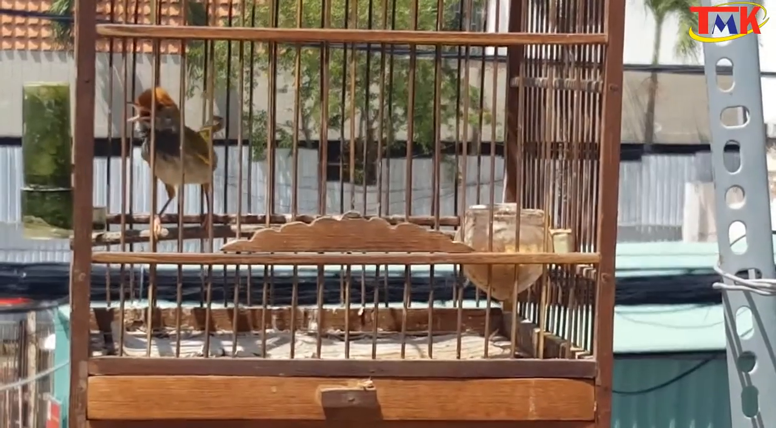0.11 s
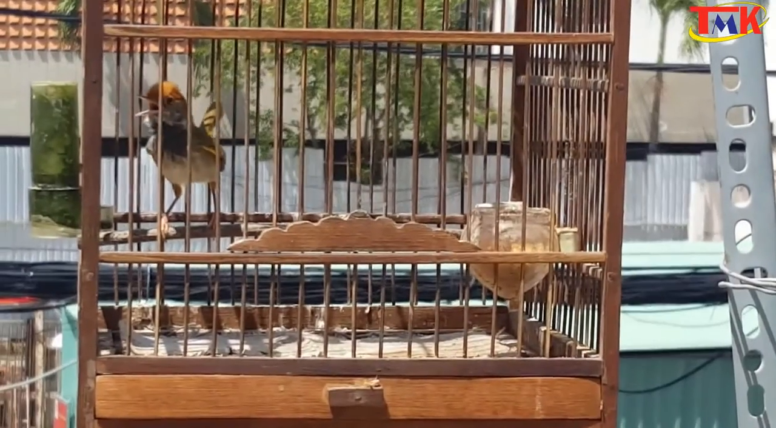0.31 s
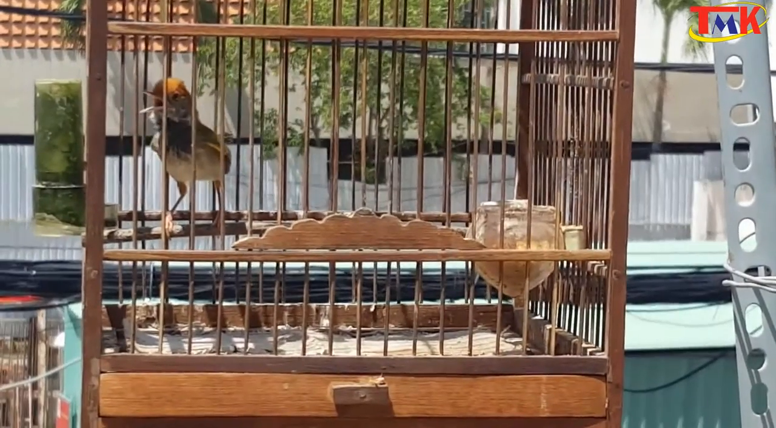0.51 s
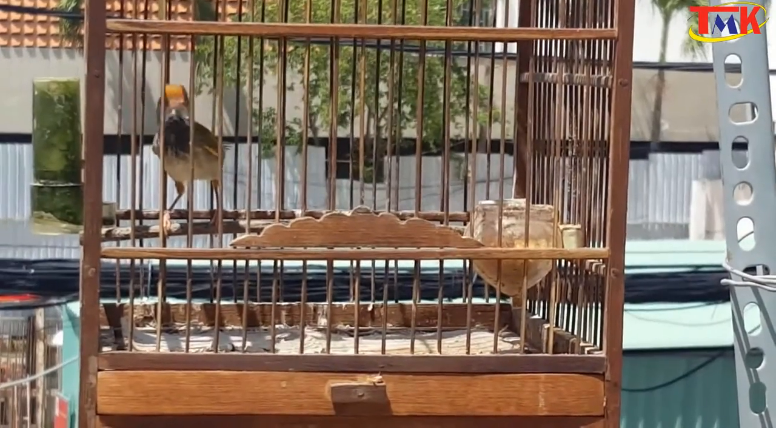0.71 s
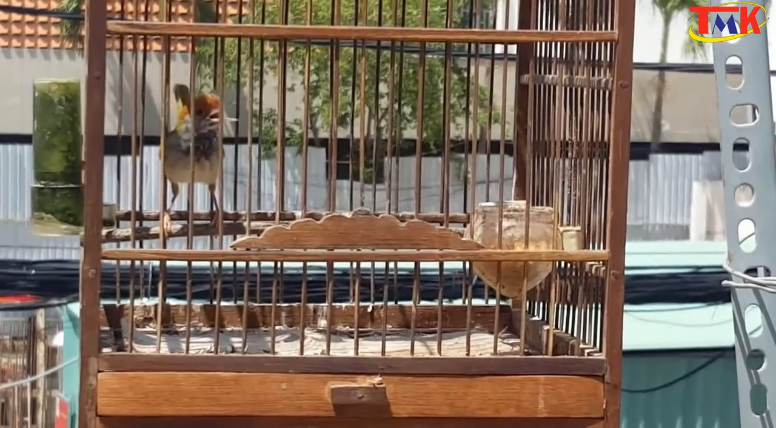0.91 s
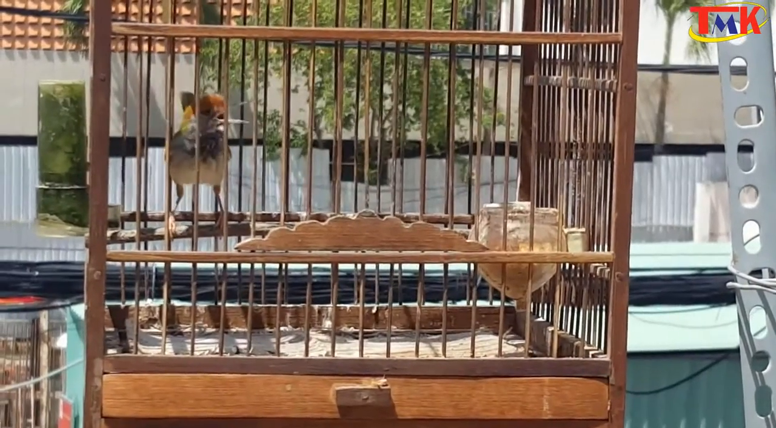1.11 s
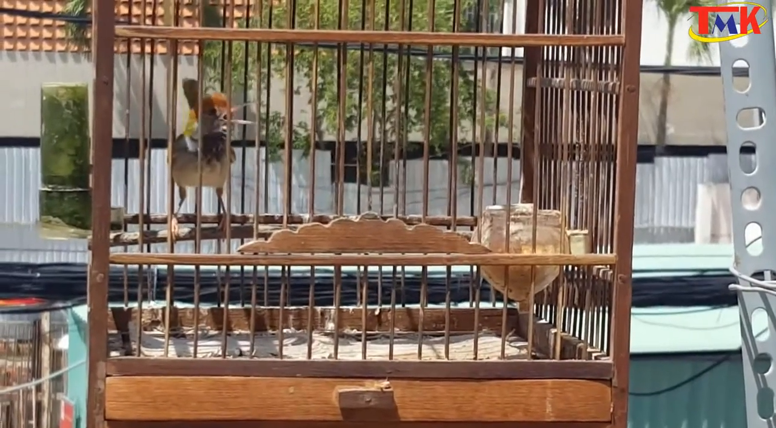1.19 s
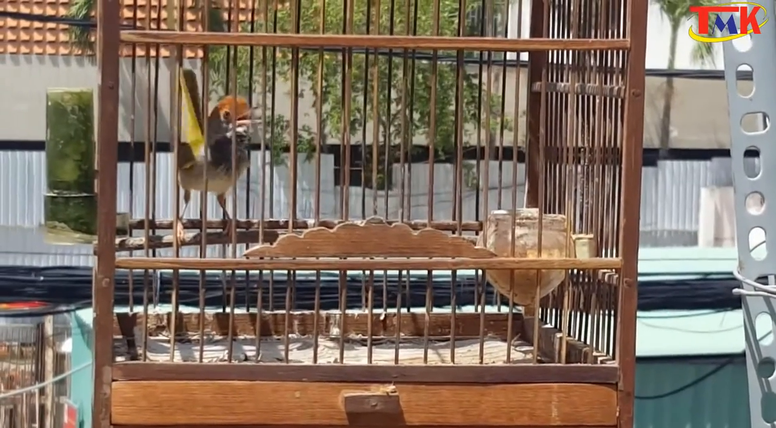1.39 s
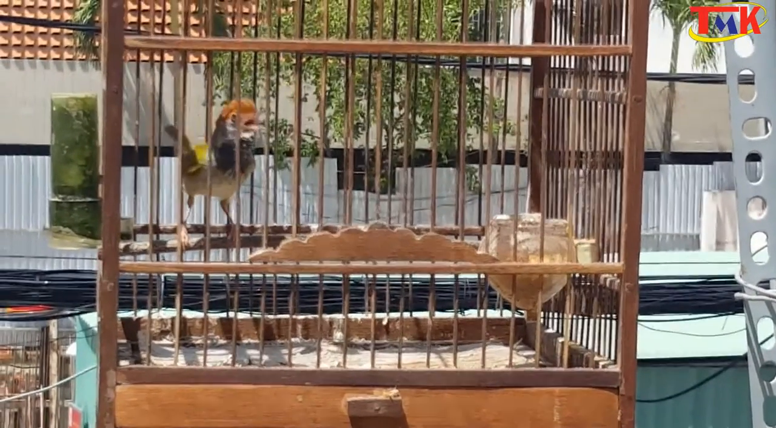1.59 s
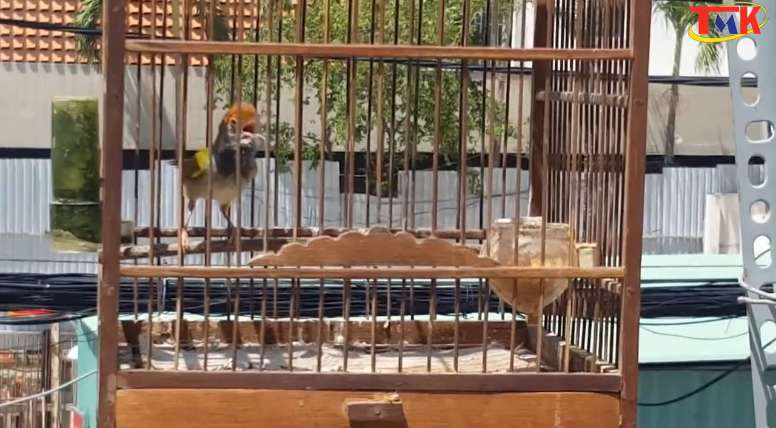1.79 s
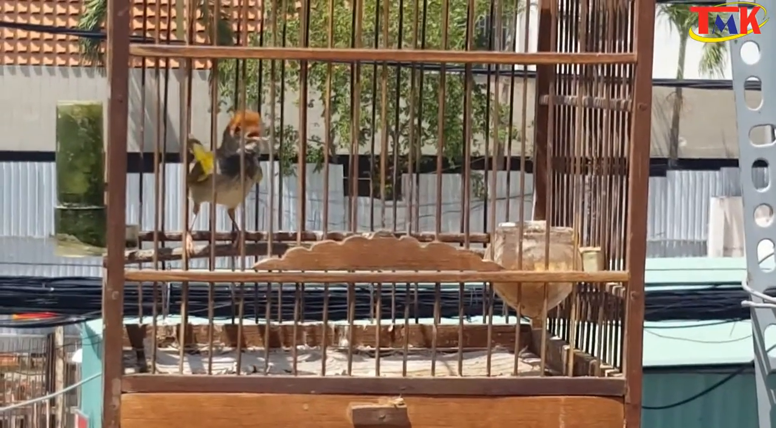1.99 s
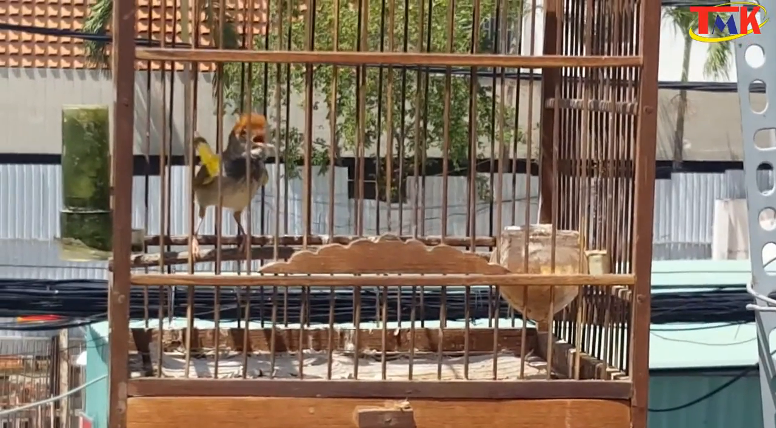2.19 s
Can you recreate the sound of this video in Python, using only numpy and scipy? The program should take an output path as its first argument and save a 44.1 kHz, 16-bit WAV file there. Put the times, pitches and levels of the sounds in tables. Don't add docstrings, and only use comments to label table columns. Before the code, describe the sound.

Two quick bursts of piercing bird trill, each opened by a snappy chip and closed by a louder, slightly longer note, close and to the left; farther birds chirp with wall echo above a low distant traffic drone.

```python
import sys
import numpy as np
from scipy import signal
from scipy.io import wavfile
from scipy.ndimage import uniform_filter1d

SR = 44100
rng = np.random.default_rng(int(sys.argv[2]) if len(sys.argv) > 2 else 0)


def master_out(mix):
    frames = np.transpose(np.atleast_2d(mix))
    ceiling = np.clip(frames, -1, 1)
    pcm = np.round(ceiling * 32767).astype(np.int16)
    wavfile.write(sys.argv[1], SR, pcm)


def natural_amplitude(level_db):
    exponent = np.asarray(level_db, float) / 20
    return 10 ** exponent


N = 97020

SINGER_OVERTONES_DB = [-48, -60, -50]


def evened(x):
    return x / np.sqrt(np.mean(abs(x) ** 2) + 1e-20)


def read(points, hz):
    point_hz, value = np.transpose(points)
    return np.interp(np.log(hz + 1), np.log(point_hz + 1), value)


def add(mix, start_s, sound):
    part = mix[max(round(start_s * SR), 0):][:len(sound)]
    part += sound[:len(part)]


def syrinx(hz, level, overtones_db, waver_hz):
    smooth = uniform_filter1d(rng.standard_normal(6000), 90)
    wobble = evened(uniform_filter1d(smooth, 90))
    phase = 2 * np.pi * np.cumsum(hz + waver_hz * np.resize(wobble, len(hz))) / SR
    wave = np.sin(phase)
    for harmonic, db in enumerate(overtones_db, 2):
        wave = wave + natural_amplitude(db) * np.sin(harmonic * phase) * (harmonic * hz < 16000)
    return level * wave


def glide(length_s, level_db, from_hz, to_hz, edge_s, overtones_db, waver_hz,
          bend=1, release=1, arch_hz=0, hook_hz=0):
    t = np.arange(0, length_s, 1 / SR)
    nearest_end = np.minimum(t, (length_s - t) / release)
    level = natural_amplitude(level_db) * np.sin(np.pi / 2 * np.clip(nearest_end / edge_s, 0, 1)) ** 2
    hz = from_hz + (to_hz - from_hz) * (t / length_s) ** bend
    hz = hz + arch_hz * np.sin(np.pi * t / length_s) ** 2
    hz = hz + hook_hz * np.exp(-t / 0.00064)
    return syrinx(hz, level, overtones_db, waver_hz)


def calls(rows, edge_s, overtones_db, waver_hz, bend=1):
    out = np.zeros(N)
    for start_s, *note in rows:
        add(out, start_s, glide(*note, edge_s, overtones_db, waver_hz, bend=bend))
    return out


def phrase(curves, overtones_db, waver_hz):
    out = np.zeros(N)
    for curve in curves:
        time_s, pitch_hz, level_db = np.transpose(curve)
        t = np.arange(time_s[0], time_s[-1], 1 / SR)
        hz = uniform_filter1d(np.interp(t, time_s, pitch_hz), 150)
        level = np.sqrt(2) * natural_amplitude(np.interp(t, time_s, level_db)) * signal.windows.tukey(len(t), .08)
        add(out, time_s[0], syrinx(hz, level, overtones_db, waver_hz))
    return out


def placed(x, pan_db, lag, wet_db, t60, early_db):
    size = SR // 2
    taps = np.zeros((2, size))
    at = np.arange(200, size - 20, 20) + rng.integers(0, 20, (2, (size - 201) // 20))
    np.put_along_axis(taps, at, rng.choice([-1., 1.], at.shape), 1)
    taps *= natural_amplitude(-60 * np.arange(size) / SR / t60)
    taps *= natural_amplitude(wet_db) / np.linalg.norm(taps[0])
    echoes = rng.integers(120, 1100, (2, 6))
    bounces = natural_amplitude(early_db - echoes / 110) * rng.choice([-1., 1.], echoes.shape)
    np.put_along_axis(taps, echoes, bounces, 1)
    taps[0, max(round(lag), 0)] = natural_amplitude(pan_db / 2)
    taps[1, max(-round(lag), 0)] = natural_amplitude(-pan_db / 2)
    return signal.fftconvolve(x[None], taps, axes=1)[:, :N]


def wash(shape_db, level_db, patchy_db, swell_db):
    # frequency_hz, coherence (0 to 1)
    likeness = [(60, .98), (200, .98), (500, .6), (1500, .45), (4000, .3)]
    # frequency_hz, phase_rad
    phase_lag = [(300, .1), (700, 1.1), (1500, 2.7)]
    count, hz = N // 512 + 5, np.fft.rfftfreq(2048, 1 / SR)
    a, b, c, d, patches = rng.standard_normal((count, 1025, 5)).T
    patches = evened(uniform_filter1d(uniform_filter1d(patches, 30, 0), 6, 1))
    swell = evened(uniform_filter1d(rng.standard_normal(count), 9))
    same = np.clip(read(likeness, hz), -1, 1)[:, None]
    left, other = a + 1j * b, c + 1j * d
    right = same * np.exp(-1j * read(phase_lag, hz))[:, None] * left + np.sqrt(1 - same ** 2) * other
    z = np.array([left * natural_amplitude(1.77), right])
    z *= natural_amplitude(shape_db(hz)[:, None] + patchy_db * patches + swell_db * swell)
    return natural_amplitude(level_db) * evened(signal.istft(z, nperseg=2048, noverlap=1536)[1][:, :N])


def city():
    # frequency_hz, density_db (per Hz)
    rumble = [(25, -48), (66, -1.5), (130, -1), (266, -9.5), (430, -15.5), (1500, -23)]

    def shape_db(hz):
        treble_loss = 30 * np.clip(np.log2((hz + 1) / 2000), 0, 3)
        return read(rumble, hz) - treble_loss - 40 * (hz < 20)

    return wash(shape_db, -34.5, 0.78, 0.81)


def drone():
    # pitch_hz, width_hz, level_db
    engines = [(141, 12, -40), (118, 20, -43), (265, 11, -52)]
    t, out = np.arange(N) / SR, np.zeros(N)
    for pitch_hz, width_hz, level_db in engines:
        r = np.exp(-np.pi * width_hz / SR)
        slow = rng.standard_normal(N) + 1j * rng.standard_normal(N)
        for _ in range(2):
            slow = signal.lfilter([1 - r], [1, -r], slow)
        out += natural_amplitude(level_db) * evened((slow * np.exp(2j * np.pi * pitch_hz * t)).real)
    return out * natural_amplitude([[.6], [-.6]])


def air():
    # frequency_hz, density_db (per Hz)
    chorus = [(3000, 0), (4300, 2), (5800, -3), (7100, -3.5), (8900, -8.5), (9600, -19), (14600, -18)]
    # time_s, level_db
    chorus_swell = [(0, 1.5), (.9, -0.5), (1.3, 3), (1.85, 3.5), (1.97, -1), (2.05, -11.5), (2.12, -2.5)]

    def shape_db(hz):
        return read(chorus, hz) - 30 * np.clip(np.log2(1500 / (hz + 1)), 0, 3)

    swell_db = np.interp(np.arange(N) / SR, *np.transpose(chorus_swell))
    return wash(shape_db, -43, 3, 1.6) * natural_amplitude(swell_db)


def chirpers():
    # start_s, length_s, level_db, from_hz, to_hz
    far_chirps = [(0, 0.02, -40.5, 5900, 7500), (0.105, 0.097, -50.5, 5490, 6650),
                  (0.166, 0.027, -44, 6910, 7520), (0.337, 0.028, -43, 5370, 6650),
                  (0.37, 0.017, -42, 6900, 6800), (0.591, 0.055, -47, 4540, 7830),
                  (1.163, 0.043, -44, 6350, 6054), (1.194, 0.028, -47, 5950, 7080),
                  (1.574, 0.03, -47, 4700, 7600), (2.072, 0.039, -46.5, 3730, 4420),
                  (2.103, 0.017, -53.5, 6600, 6770), (0.718, 0.042, -51, 4480, 5320),
                  (1.616, 0.027, -49, 5100, 3770), (1.653, 0.061, -51, 5440, 3880),
                  (1.705, 0.023, -53.5, 5600, 6900), (1.803, 0.02, -47, 4050, 4700),
                  (1.851, 0.036, -52, 4980, 6990)]
    return placed(calls(far_chirps, .01, [-28], 380), -0.22, 3, 14.6, 0.21, 4.9)


def callers():
    # start_s, length_s, level_db, from_hz, to_hz
    sweeps = [
        (0.522, 0.056, -32.5, 3300, 2113),
        (0.987, 0.0207, -31.5, 3070, 1950),
        (1.479, 0.026, -35.5, 3000, 1920),
        (1.644, 0.063, -36, 3180, 1780),
        (0.221, 0.017, -27.5, 4700, 5860),
        (1.945, 0.012, -37.5, 7830, 8680),
    ]
    # start_s, length_s, level_db, from_hz, to_hz
    squeak = (.956, .011, -36, 6300, 7900)
    return placed(calls([*sweeps, squeak], .007, [-35], 40), .3, -1.2, 1, 0.23, -8.5)


def whistlers():
    # time_s, pitch_hz, level_db
    whistle_1 = [(.53, 2500, -45), (.60, 2480, -40), (.64, 2436, -56), (.74, 2477, -40.5), (.88, 2450, -64)]
    # time_s, pitch_hz, level_db
    whistle_2 = [(0.897, 3090, -47.5), (0.96, 3110, -44.5), (1.041, 3140, -48), (1.091, 3177, -29),
                 (1.123, 3250, -25)]
    # time_s, pitch_hz, level_db
    whistle_3 = [(1.03, 2085, -48), (1.089, 2125, -35), (1.148, 2123, -42), (1.23, 2137, -34.5),
                 (1.29, 2095, -48)]
    # time_s, pitch_hz, level_db
    whistle_4 = [(1.765, 2370, -53), (1.851, 2400, -38.5), (1.9, 2492, -45.5), (1.992, 2451, -38),
                 (2.096, 2498, -41.5)]
    tones = phrase([whistle_1, whistle_2, whistle_3, whistle_4], [-40], 6)
    return placed(tones, -1.3, 1.2, -7, .3, -12)


def low_slider():
    # time_s, pitch_hz, level_db
    low_slide = [(.745, 3650, -41), (.752, 3400, -25), (.759, 1986, -40), (.79, 2050, -47.5),
                 (.815, 2497, -42), (.828, 2635, -28.5), (.836, 3052, -28), (.848, 3355, -38.5),
                 (.89, 3240, -52)]
    # start_s, length_s, level_db, from_hz, to_hz
    flicks = [
        (1.107, 0.0393, -31.5, 2900, 4040),
        (2.086, 0.046, -31.5, 2200, 3340),
        (0.42, 0.045, -47, 2700, 1900),
    ]
    blurred = phrase([low_slide], [-38], 120) + calls(flicks, .008, [-35], 90, bend=.75)
    return placed(blurred, -.2, -2.1, 4, .22, -1)


def close_slider():
    # time_s, pitch_hz, level_db
    high_slide = [(.962, 5770, -43), (.967, 6990, -23), (.971, 7410, -22.5), (.99, 7335, -21),
                  (1.012, 6920, -17.5), (1.03, 6330, -21), (1.037, 6270, -35.5), (1.05, 5900, -33.5),
                  (1.056, 6140, -43)]
    # time_s, pitch_hz, level_db
    vee_slide = [(1.305, 3650, -28), (1.318, 3537, -20.5), (1.327, 3280, -18.5), (1.336, 2124, -39),
                 (1.347, 2970, -22), (1.356, 3360, -27.5), (1.362, 3340, -14), (1.377, 3920, -28.5),
                 (1.392, 4180, -31)]
    high = placed(phrase([high_slide], [-31], 25), -3.5, 1.1, -8, .27, -10)
    vee = placed(phrase([vee_slide], [-38], 40), -1.5, -1.1, -2, .2, -11)
    return high + vee


def chip(length_s, level_db, from_hz, to_hz):
    beak_hz, beak_width_hz = 4300, 620
    cage_delay_s, cage_db, cage_t60_s = .0042, -10, .07
    note = glide(length_s, level_db, from_hz, to_hz, .0015, SINGER_OVERTONES_DB, 200)
    detuning = (np.linspace(from_hz, to_hz, len(note)) - beak_hz) / beak_width_hz
    note = note / (1 + detuning ** 2) ** 1.3
    t = np.arange(0, cage_t60_s / 2, 1 / SR)
    scatter = rng.standard_normal(len(t)) * natural_amplitude(-60 * t / cage_t60_s) * (t > cage_delay_s)
    scatter = scatter * natural_amplitude(cage_db) / np.linalg.norm(scatter)
    scatter[0] = 1
    return np.convolve(note, scatter)


def trill(rows):
    out = np.zeros(N)
    for k, (peak_s, peak_db) in enumerate(rows):
        u = k / (len(rows) - 1)
        young = np.exp(-u / .25)
        up_hz = 100 * u ** 3
        from_hz = 3400 + up_hz + young * (2900 - 3400)
        to_hz = 3370 + up_hz + young * (3850 - 3370)
        length_s = .011 + .006 * u ** 2
        edge_s = .0045 * (1 - .3 * u)
        release = .75 + 1.3 * u ** 1.5
        note = glide(length_s, peak_db + 1.5, from_hz, to_hz, edge_s, SINGER_OVERTONES_DB, 36,
                     bend=.45 + .5 * young, release=release, hook_hz=244 * u)
        add(out, peak_s - .0025, note)
    return out


def singer():
    # start_s, length_s, level_db, from_hz, to_hz
    chip_notes = [
        (0.198, .009, -10.5, 5400, 2700),
        (1.4195, 0.0105, -11, 5700, 2700),
    ]
    # peak_s, peak_db
    first_trill = [(0.2578, -26.5), (0.2798, -25), (0.3042, -24.5), (0.3277, -21), (0.3516, -21),
                   (0.3745, -20), (0.3975, -19), (0.4209, -18.5), (0.4414, -18.5), (0.4653, -20),
                   (0.4868, -18), (0.5082, -17), (0.5327, -19), (0.5531, -17), (0.5771, -18.5),
                   (0.5975, -16), (0.6195, -15.5), (0.6434, -17), (0.6634, -14.5), (0.6853, -14.5)]
    # peak_s, peak_db
    second_trill = [(1.481, -21.5), (1.5045, -21), (1.5279, -22.5), (1.5524, -21), (1.5758, -21.5),
                    (1.5993, -19.5), (1.6212, -19.5), (1.6437, -19.5), (1.6661, -17.5), (1.6881, -17),
                    (1.7105, -18.5), (1.7325, -15.5), (1.7554, -18.5), (1.7769, -16), (1.7988, -16.5),
                    (1.8213, -16), (1.8437, -15.5), (1.8657, -16), (1.8866, -13)]
    # start_s, length_s, level_db, from_hz, to_hz
    held_notes = [
        (0.697, 0.042, -10, 3570, 3570),
        (1.9045, 0.045, -9, 3535, 3520),
    ]
    out = trill(first_trill) + trill(second_trill)
    for start_s, *note in chip_notes:
        add(out, start_s, chip(*note))
    for start_s, *note in held_notes:
        held = glide(*note, .004, SINGER_OVERTONES_DB, 12, release=2.9, arch_hz=65.3, hook_hz=244)
        add(out, start_s, held)
    return placed(out, 5.1, -2, -14, .27, -18)


def scene():
    t = np.arange(N) / SR
    background = (city() + drone()) * natural_amplitude(-1.5 * (t - 1.5)) + air()
    neighbours = chirpers() + callers() + whistlers() + low_slider() + close_slider()
    return background + neighbours + singer()


def top_cut(x):
    return signal.sosfilt(signal.butter(12, 15840, fs=SR, output="sos"), x)


def record(dry):
    return top_cut(dry)


dry = scene()
out = record(dry)
master_out(out)
```